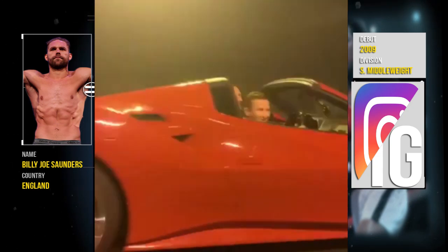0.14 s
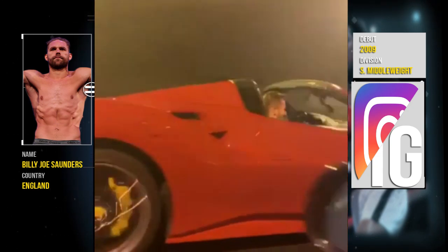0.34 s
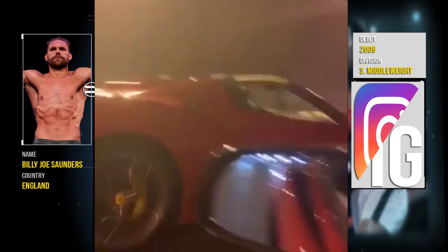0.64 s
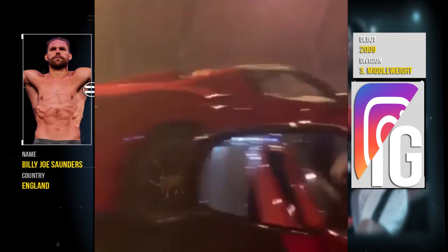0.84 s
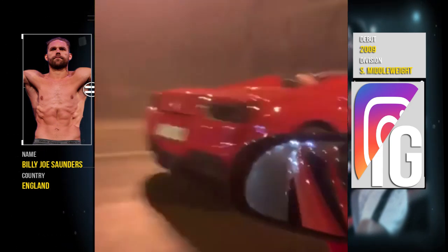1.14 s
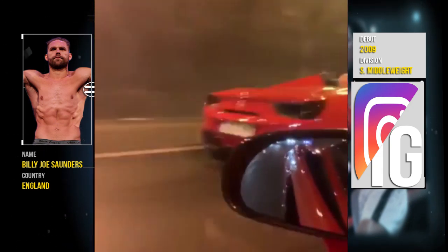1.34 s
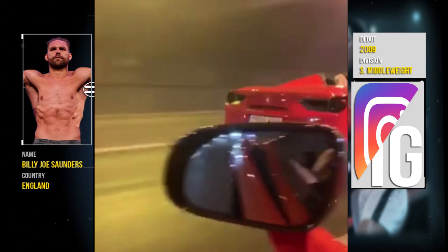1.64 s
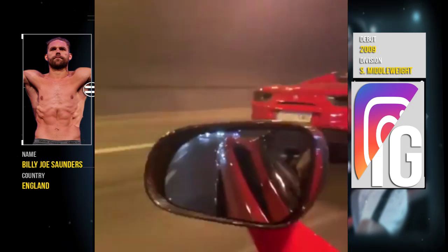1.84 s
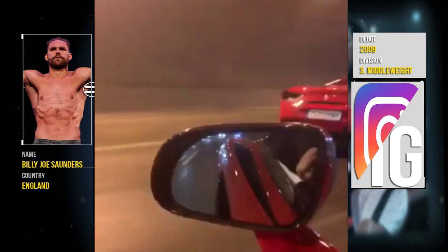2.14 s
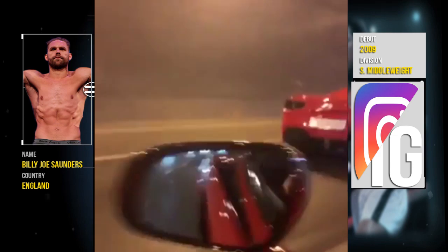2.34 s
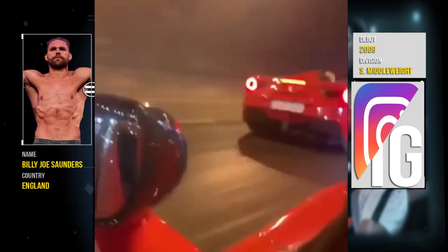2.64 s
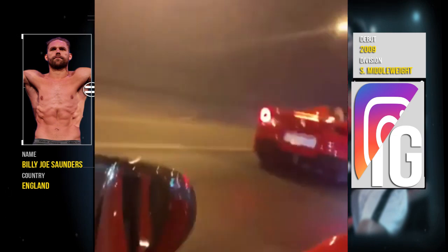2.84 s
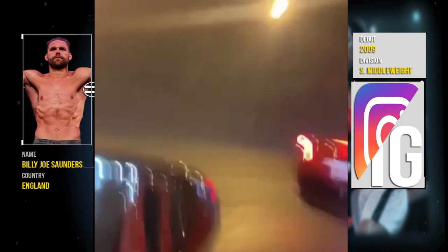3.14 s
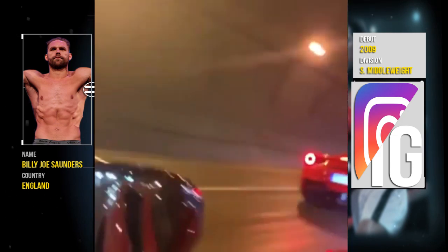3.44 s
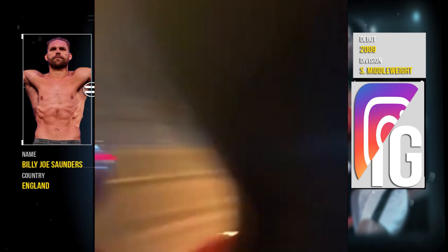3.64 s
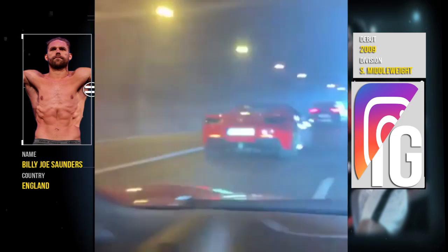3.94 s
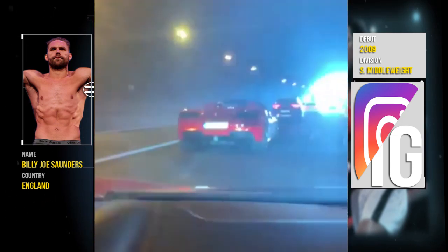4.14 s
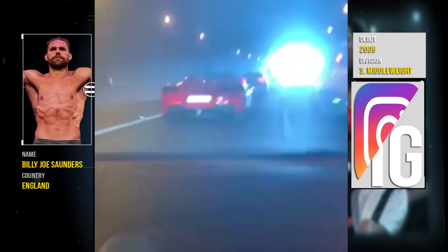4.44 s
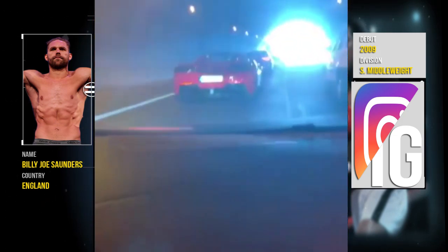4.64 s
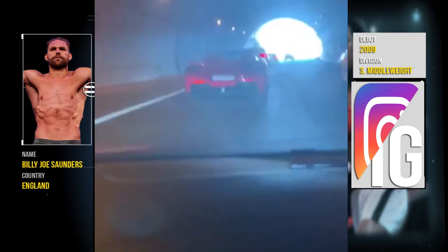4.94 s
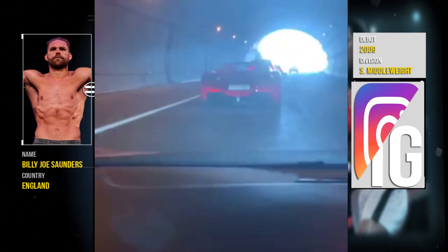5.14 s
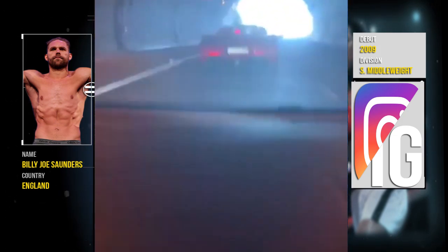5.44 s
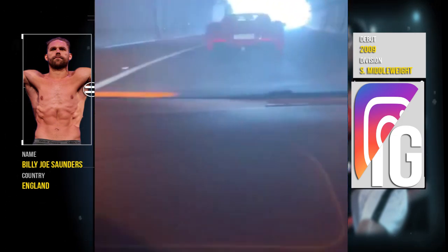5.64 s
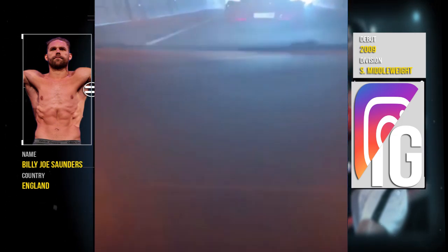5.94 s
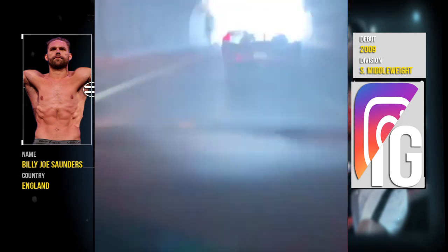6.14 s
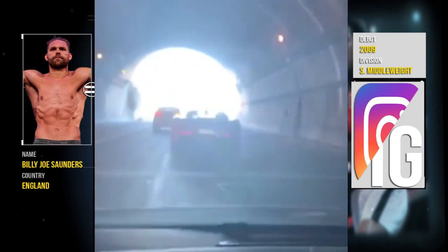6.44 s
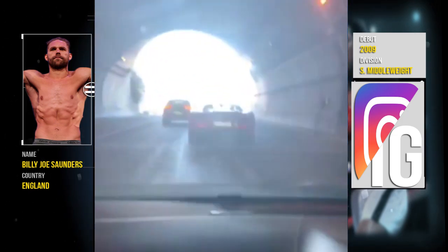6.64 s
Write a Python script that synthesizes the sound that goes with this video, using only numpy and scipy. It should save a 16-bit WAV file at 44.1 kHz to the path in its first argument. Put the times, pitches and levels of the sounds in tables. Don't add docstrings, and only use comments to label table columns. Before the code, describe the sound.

In a reverberant road tunnel, a racing engine note rises, sags with pops and wind buffeting, then accelerates again, heard from inside the car.

```python
import sys
import numpy as np
from scipy import signal
from scipy.fft import rfft, irfft, next_fast_len
from scipy.io import wavfile
from scipy.ndimage import uniform_filter1d

SR = 44100
rng = np.random.default_rng(int(sys.argv[2]) if len(sys.argv) > 2 else 0)


def to_wav(s):
    ch = np.atleast_2d(s).T
    pcm = np.round(np.clip(ch, -1, 1) * 32767)
    wavfile.write(sys.argv[1], SR, pcm.astype(np.int16))


def voltage_ratio(decibels):
    exponent = np.asarray(decibels, float) / 20
    return 10 ** exponent


N = 299439

# time in seconds, firing rate in Hz, level in dB.
PULL_1 = [(0.0, 133.8, -25.5), (0.48, 130.4, -26.5), (0.72, 135.9, -22), (0.86, 135.8, -22),
          (1.08, 146.2, -19.5), (1.44, 159.3, -19.5), (1.8, 175.4, -21.5), (1.92, 173.9, -19.5),
          (2.03, 179, -33.5)]
OVERRUN = [(1.99, 176.6, -30.5), (2.17, 187.8, -23), (2.5, 184.9, -37), (2.749, 179.7, -30.5),
           (2.999, 166.7, -34), (3.34, 156.3, -29), (3.58, 154.5, -29.5), (3.8, 141.3, -42)]
PICKUP = [(3.8, 153, -32), (4.05, 154.2, -32.5), (4.4, 154, -33.5), (4.76, 166.9, -26), (4.95, 166.8, -25),
          (5.15, 168.6, -31)]
PULL_2 = [(4.98, 144.6, -29), (5.22, 155.6, -22), (5.46, 163.7, -21.5), (5.72, 168.8, -19.5),
          (5.961, 172.2, -25.5), (6.2, 182.2, -22.5), (6.54, 193.5, -22), (6.79, 204, -22)]
# time in seconds, level in dB, throttle from 0 to 1.
ROAR = [(0.0, -35, 0.34), (0.45, -36, 0.31), (.62, -32, 0.26), (1.15, -32.5, 1), (1.5, -34, 0.94),
        (1.9, -36, 0.91), (2.1, -41.5, 0.89), (2.5, -42.5, 0.57), (2.7, -45, 0.41), (3.3, -45.5, 0.27),
        (3.65, -42.5, 0.04), (4.1, -45, 0.02), (4.7, -41, 0.34), (5.2, -38, 0.73), (5.6, -34.5, 0.64),
        (6.79, -34, .62)]
# time in seconds, peak level in dB, low thump in dB over it.
POPS = [(1.8707, -40, 9), (1.893, -28, 17), (1.9274, -27.5, 2.5), (2.0842, -44, 13), (2.1135, -35, 16),
        (2.3431, -29, -2), (2.3908, -39, 11), (2.4085, -31.5, -9), (2.441, -47, 3.5), (2.441, -33, 0.5),
        (2.4772, -32.5, -3), (2.5842, -49.5, 5), (2.5867, -57, 12), (2.6444, -45.5, 0), (2.8027, -44.5, 4),
        (2.9508, -48.5, 4), (2.9844, -29, 11.5), (2.9851, -36.5, 8), (2.9915, -31.5, 16.5),
        (3.0463, -39, -5), (3.0541, -33, 14), (3.317, -52, 15.5), (3.3315, -51, 11), (3.586, -52.5, 19.5)]


def evened(x):
    return x / np.sqrt(np.mean(x ** 2) + 1e-20)


def read(points, hz, column=1):
    table = np.transpose(points)
    return np.interp(np.log(hz + 1), np.log(table[0] + 1), table[column])


def along(rows, t):
    s, *columns = np.transpose(rows)
    return [np.interp(t, s, c) for c in columns]


def wander(size, hz):
    slow = signal.butter(2, hz, fs=SR / 32)
    coarse = signal.lfilter(*slow, rng.standard_normal(size // 32 + 1400))[1398:]
    return np.interp(np.arange(size) / 32, np.arange(len(coarse)), evened(coarse))


def noise(field_db, size, patchy_db):
    hop = size // 4
    frames, hz = N // hop + 5, np.fft.rfftfreq(size, 1 / SR)[:, None]
    a, b, c, d, patches = rng.standard_normal((frames, len(hz), 5)).T
    patches = evened(uniform_filter1d(uniform_filter1d(patches, 8, 0), 10, 1))
    gain = voltage_ratio(field_db(np.arange(frames) * hop / SR, hz) + patchy_db * patches)
    z = np.array([a + 1j * b, c + 1j * d]) * gain
    return signal.istft(z, nperseg=size, noverlap=size - hop)[1][:, :N] / np.sqrt(size)


def engine(rows, side_orders, flutter, jitter, upper_db=(), nulls=()):
    # frequency in Hz, level in dB.
    pipe = [(250, -18), (330, -11), (390, -5), (440, 2.5), (500, -6), (560, -10), (620, -11)]
    null_s = 0.046
    start, end = round(rows[0][0] * SR), min(round(rows[-1][0] * SR), N)
    size = end - start
    t = np.arange(start, end) / SR
    hz, level_db = along(rows, t)
    turn = 2 * np.pi * np.cumsum(hz) / SR + jitter * wander(size, 12.8)

    first_db = level_db - sum(db * np.exp(-((t - s) / null_s) ** 2) for s, db in nulls)
    orders = [(1, first_db)]
    orders += [(k, level_db + db + read(pipe, k * hz)) for k, db in enumerate(upper_db, 2)]
    orders += [(k, level_db + db) for k, db in side_orders]
    note = np.zeros(size)
    for k, db in orders:
        strength = voltage_ratio(db) * (1 + flutter * wander(size, 28.5))
        note += strength * np.sin(k * turn + 7 * rng.random())
    out = np.zeros(N)
    out[start:end] = np.sqrt(2) * note * signal.windows.tukey(size, 5000 / size)
    return out


def near_engine():
    # multiple, level in dB against the
    open_orders = [(.5, -12), (1.5, -23), (4, -26.5), (5, -20.5), (6, -31), (7, -23.5), (9, -28.5),
                   (11, -25), (12, -33), (13, -25.5)]
    side_orders = [(.5, -28.5), (.75, -24), (2.25, -21.5), (4, -24), (5, -22), (6, -30.5), (7, -26),
                   (8, -27.5), (9, -26.5), (10, -32.5)]
    # 2nd and 3rd, in dB against the 1st.
    upper = [
        (-4.5, 0.5),
        (-9, -23),
        (-6.5, -15.5),
        (-1.5, -9),
    ]
    # time in seconds, depth in dB.
    nulls = [(.1, 3), (.58, 11), (.83, 4.5), (1.191, 10), (2.04, 9), (2.3, 14), (2.97, 11), (3.22, 26),
             (3.46, 7.5), (3.93, 14), (4.17, 16), (5.36, 3.5), (6.07, 3), (6.31, 6.5)]
    out = engine(PULL_1, open_orders, 0.25, 0.1, upper[0], nulls)
    for phase, upper_db in zip((OVERRUN, PICKUP, PULL_2), upper[1:]):
        out += engine(phase, side_orders, 0.25, 0.12, upper_db, nulls)
    return out


def rival_engine():
    # time in seconds, firing rate in Hz, level in dB.
    window_note = [(0.55, 410, -22.5), (0.7, 406.6, -19), (0.83, 404.7, -32), (1.11, 411.2, -43),
                   (1.25, 421, -22.5), (1.67, 465.7, -26), (1.81, 479.7, -37.5), (2.05, 476, -37)]
    # start in seconds, length in seconds, rate in Hz, climb in Hz per second, level in dB.
    snatches = [
        (5.0, .65, 429.8, 25.4, -31.5),
        (5.75, 0.35, 383, 28, -32),
        (6.3, .49, 416.7, 5.6, -29.5),
    ]
    fade_db = [-4, 1, -3, -13]
    curves = [window_note]
    for start, length, hz, climb, level_db in snatches:
        s = np.linspace(0, length, len(fade_db))
        curves.append(np.transpose([start + s, hz + climb * s, level_db + np.array(fade_db)]))
    return sum(engine(rows, [(0.5, -15.5), (2, -28)], flutter=0.29, jitter=0.38) for rows in curves)


def crackles():
    out, t = np.zeros(N + 2000), np.arange(2000) / SR
    colour = signal.butter(1, [600, 2200], "band", fs=SR)
    onset = np.minimum(t / 0.0003, 1)
    for (s, db, thump_db), grit in zip(POPS, rng.standard_normal((len(POPS), 2000))):
        crack = signal.lfilter(*colour, grit + 0.47 * np.roll(grit, 2))
        crack = 3.8 * crack * np.exp(-t / 0.0026) * onset
        push = (1 - t / 0.0016) * np.exp(-t / 0.0025) * np.minimum(t / 0.0011, 1)
        out[round(s * SR):][:2000] += voltage_ratio(db) * (crack + voltage_ratio(thump_db) * push)
    return out[:N]


def tunnel(x):
    # frequency in Hz, seconds to fall by 60 dB.
    decay = [(100, 1.67), (1000, 0.76), (4000, 0.15), (11000, 0.15)]
    taps = np.zeros((2, SR))
    at = np.arange(300, SR - 20, 20) + rng.integers(0, 20, (2, (SR - 301) // 20))
    np.put_along_axis(taps, at, rng.choice([-1., 1.], at.shape), 1)
    hz, t, z = signal.stft(taps, SR, nperseg=256)
    tail = signal.istft(z * voltage_ratio(-60 * t / read(decay, hz)[:, None]), SR, nperseg=256)[1]
    return signal.fftconvolve(x[None], tail / np.linalg.norm(tail[0]), axes=1)[:, :N]


def roar():
    # frequency in Hz, level in dB.
    roar_shape = [(60, 2), (110, 31.5), (250, 12), (420, 17.5), (650, 5), (1000, 5.5), (1450, 4), (2000, 0),
                  (2600, -7), (4200, -14), (5200, -13), (6800, -20), (9000, -24), (11000, -27),
                  (11800, -35)]
    after_crack_db, after_crack_s, surge_db = 35.5, 0.02, 0.8

    def field_db(t, hz):
        level_db, throttle = along(ROAR, t)
        rasp_db = -16 + 19.5 * throttle
        hiss_db = -27.5 + 15.5 * throttle
        drone_db = 1.5 - 0.5 * throttle
        after = sum(voltage_ratio(db + after_crack_db) ** 2 * (t > s) * np.exp(-abs(t - s) / after_crack_s)
                    for s, db, _ in POPS)
        level_db = level_db + 10 * np.log10(1 + after * voltage_ratio(-41.5 - level_db) ** 2)
        level_db = level_db + surge_db * np.interp(t * SR, np.arange(N), wander(N, 9))
        drone = np.interp(hz, [350, 800], [1, 0])
        rasp = np.interp(hz, [1190, 1890, 2580, 5150], [0.016, 1, 0.76, 0.26])
        hiss = np.interp(hz, [2000, 2600, 5000], [0, 0.2, 1])
        moving_db = drone * (drone_db - 7.0) + rasp * (rasp_db + 2.5) + hiss * (hiss_db + 19.0)
        return read(roar_shape, hz) + level_db + moving_db

    gas = noise(field_db, size=1024, patchy_db=1.64) * voltage_ratio(14)
    low = signal.sosfiltfilt(signal.butter(2, 900, fs=SR, output="sos"), gas)
    firing_hz = along(PULL_1[:-1] + OVERRUN + PICKUP[:-1] + PULL_2, np.arange(N) / SR)[0]
    puffs = 1 + 0.1 * np.cos(2 * np.pi * np.cumsum(firing_hz) / SR) + 0.15 * wander(N, 27)
    return low + (gas - low) * puffs


def wind():
    # time in seconds, level in dB.
    wind_level = [(0, -30), (.6, -29), (1.2, -26), (1.9, -27.5), (2.3, -28.5), (2.6, -35.5), (3.1, -35),
                  (3.7, -39), (3.95, -60), (6.79, -51.5)]
    # frequency in Hz, level in dB.
    wind_shape = [(20, -21), (60, -4.5), (180, 5), (450, -4), (900, -8.5), (1400, -22.5), (2600, -91)]
    lumps = noise(lambda t, hz: read(wind_shape, hz) + 0 * t, size=1024, patchy_db=5)
    drift_db = 3.1 * np.array([wander(N, 6.9), wander(N, 6.7)])
    return evened(lumps) * voltage_ratio(along(wind_level, np.arange(N) / SR)[0] + drift_db)


def body_rumble():
    # frequency in Hz, level in dB.
    rumble_shape = [(12, -37), (20, 11.5), (54, 20.5), (102, 10), (125, 2.5), (160, -2), (280, -120)]
    # time in seconds, level in dB.
    gusts = [(.04, -23), (.2, -25), (.41, -22.5), (.62, -24), (.9, -23.5), (1.18, -20.5), (1.4, -33),
             (1.62, -19), (1.92, -25.5), (2.09, -25), (2.31, -21.5), (2.481, -24), (2.66, -32.5),
             (3.02, -25.5), (3.14, -25.5), (3.33, -27.5), (5.39, -36), (6.08, -30.5), (6.31, -31),
             (6.56, -39)]
    gust_s, body_db, body_per_roar = 0.063, -42.5, 0.1
    low = noise(lambda t, hz: read(rumble_shape, hz) + 0 * t, size=2048, patchy_db=2)[0]
    t = np.arange(N) / SR
    thumps = voltage_ratio(body_db + body_per_roar * (along(ROAR, t)[0] + 41))
    thumps = thumps + sum(voltage_ratio(db) * np.exp(-((t - s) / gust_s) ** 2) for s, db in gusts)
    return thumps * voltage_ratio(1.53 * wander(N, 4.2)) * evened(low)


def cabin_boom():
    # time in seconds, pitch in Hz, level in dB.
    boom_curve = [(3.9, 57.2, -48), (4.15, 56.6, -33.5), (4.75, 57.97, -34), (5.3, 53.08, -27),
                  (6.0, 49.65, -38), (6.3, 51.3, -27.5), (6.79, 52.9, -38)]
    return engine(boom_curve, [], flutter=0.27, jitter=0.19)


def ports(pair):
    # frequency in Hz, likeness of the two ports from 0 to 1.
    likeness = [(60, 0.99), (200, 1), (420, 0.54), (750, 0.22), (1100, 0.3), (1700, 0.73), (2500, 0.17),
                (3200, 1), (4800, 0.7), (11000, 0.73)]
    # frequency in Hz, lead of the left port in radians.
    left_lead = [(0, 0), (1700, 0), (2500, 1.3), (3200, .9), (4950, 3.14), (6900, 6.28), (9050, 9.42),
                 (11200, 12.57)]
    size = next_fast_len(N + 4096)
    a, b = rfft(pair, size)
    hz = np.fft.rfftfreq(size, 1 / SR)
    same = np.clip(read(likeness, hz), 0, 1)
    lead = np.exp(0.5j * np.interp(hz, *np.transpose(left_lead)))
    shared, opposed = np.sqrt((1 + same) / 2) * a, np.sqrt((1 - same) / 2) * b
    return irfft(np.array([(shared + opposed) * lead, (shared - opposed) / lead]), size)[:, :N]


def scene():
    engines, pops = near_engine() + rival_engine(), crackles()
    air = engines * [[1], [0]] + voltage_ratio(-13.5) * tunnel(engines)
    air = air + pops + voltage_ratio(-8.5) * tunnel(pops)
    return ports(air + roar()) + body_rumble() + wind() + cabin_boom()


def band_limit(x):
    return signal.sosfilt(signal.butter(12, 12760, fs=SR, output="sos"), x)


def record(dry):
    rounded = 0.62 * np.tanh(dry / 0.62)
    limited = signal.oaconvolve(rounded, signal.firwin(301, 11800, fs=SR)[None], "same", axes=1)
    return band_limit(limited)


dry = scene()
out = record(dry)
to_wav(out)
```